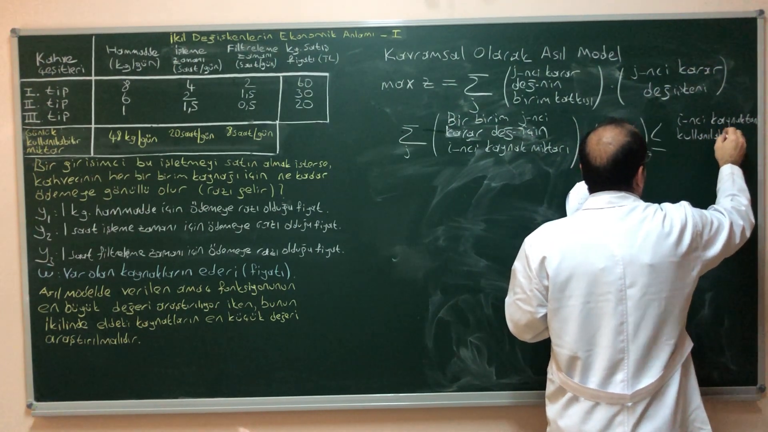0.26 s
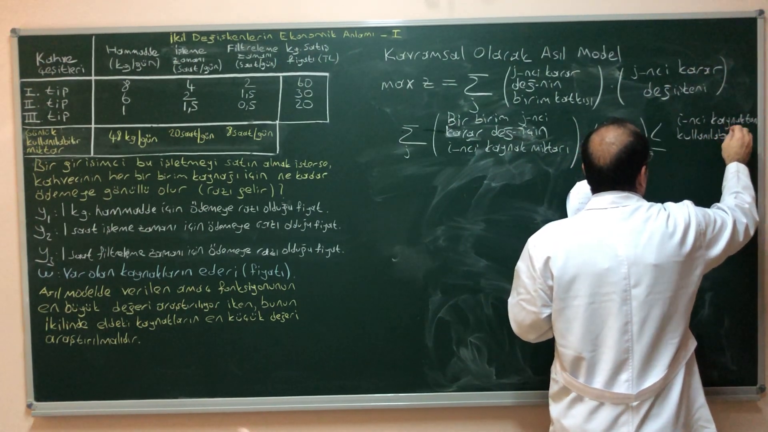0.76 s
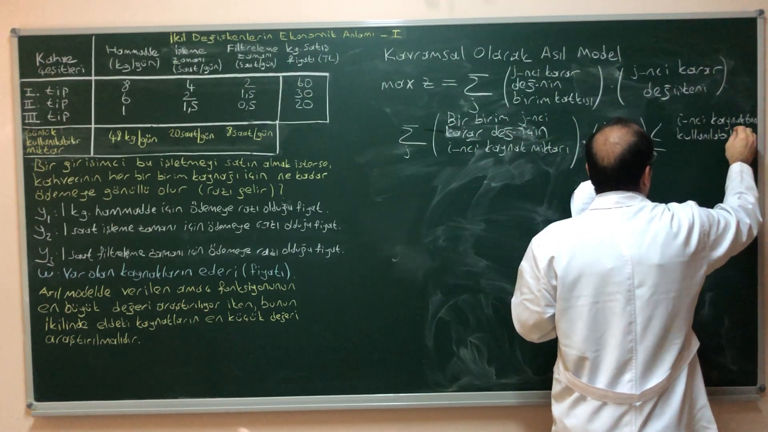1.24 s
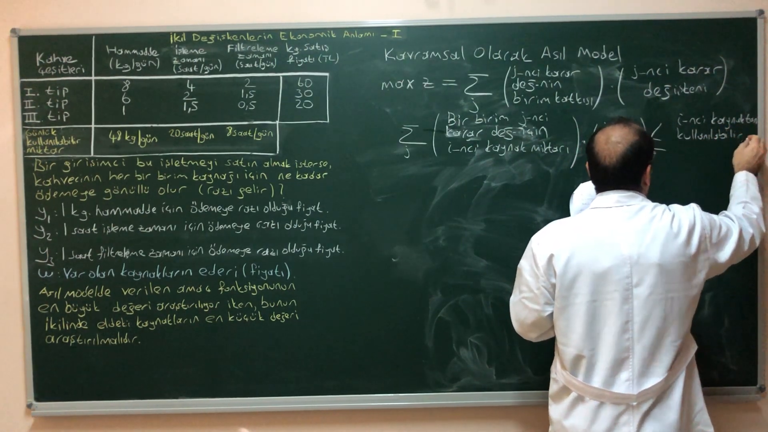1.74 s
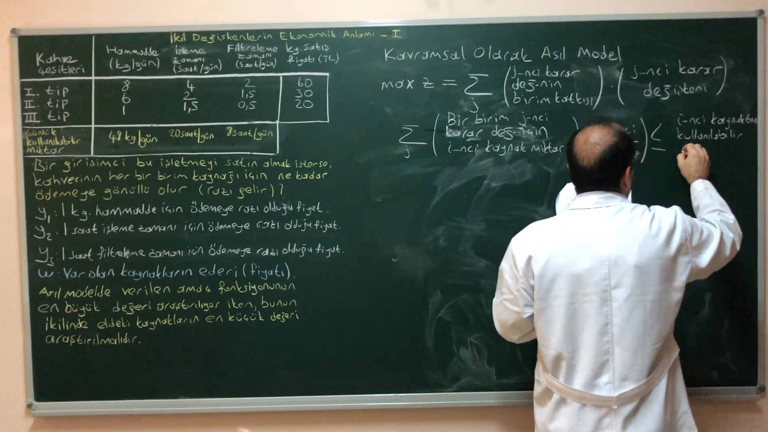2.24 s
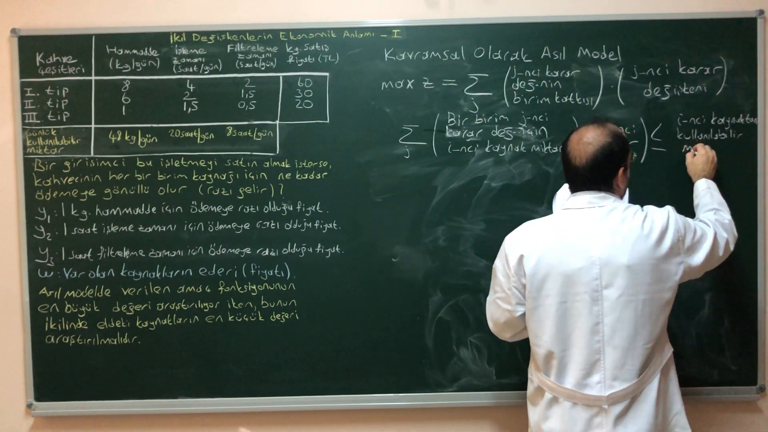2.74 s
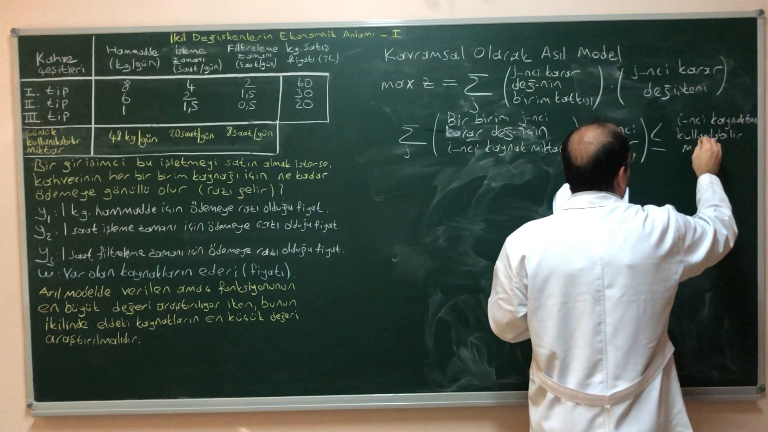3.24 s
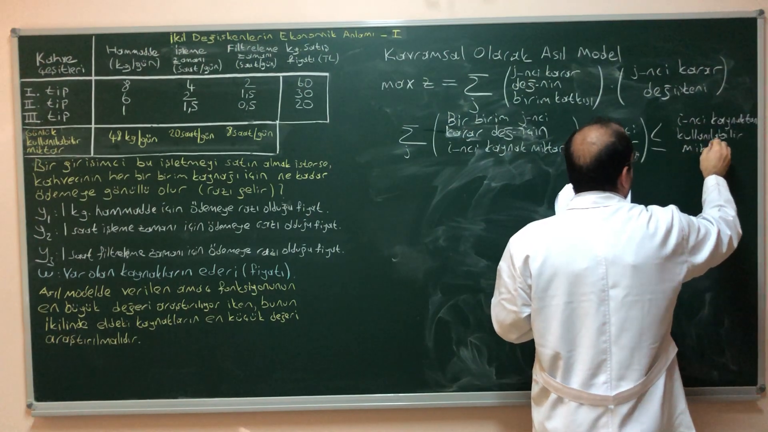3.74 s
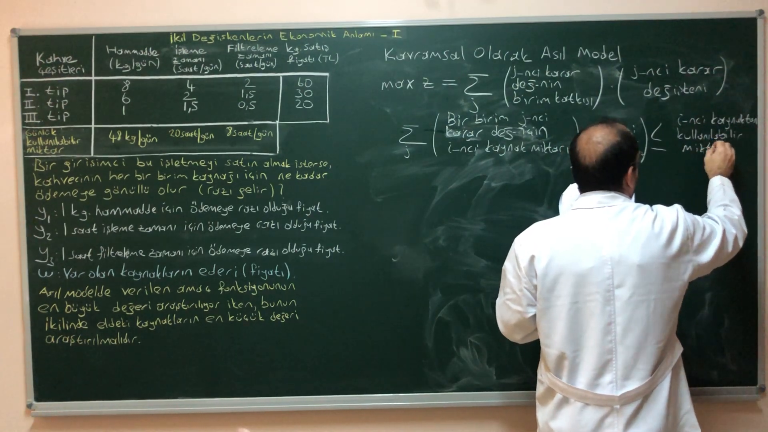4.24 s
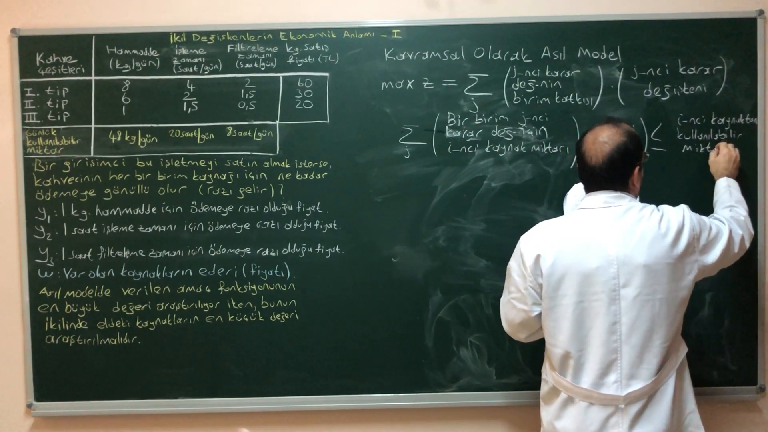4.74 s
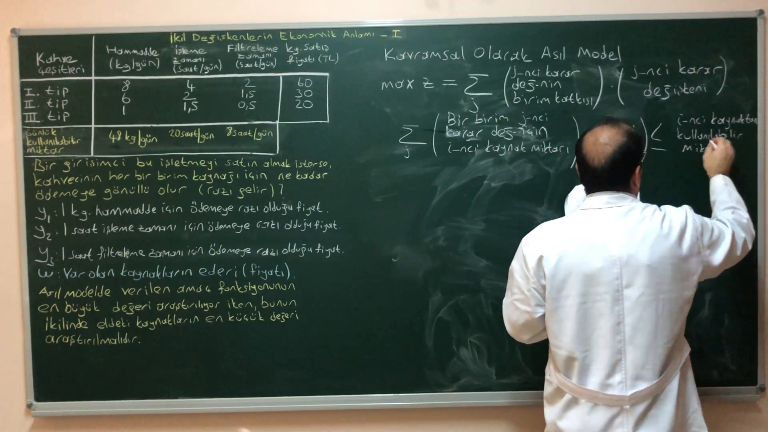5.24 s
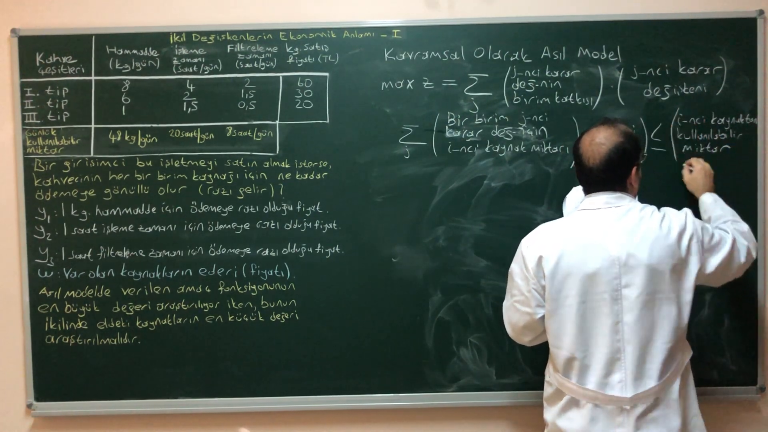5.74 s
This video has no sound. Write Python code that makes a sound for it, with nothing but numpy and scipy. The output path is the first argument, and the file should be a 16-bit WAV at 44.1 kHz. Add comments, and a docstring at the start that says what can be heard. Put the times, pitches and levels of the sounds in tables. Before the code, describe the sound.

Chalk knocks and squeaks briskly on a blackboard in an echoing classroom, pausing midway, then tapping steadily again with one piercing squeak.

```python
"""Chalk writes on a wall-mounted blackboard in a bare, reverberant classroom.
Throughout: ventilation hiss (coloured noise), wavering hum (low sines), a faint rub (grain noise).
0-1.6 s: a stick-slip squeak (sine with overtones), then knocks (filtered clicks), two more squeaks.
1.7-2.8 s: a lull with one faint knock, weak squeaks and soft grinding (swells of grain noise).
2.9-6 s: steady knocks, a strong squeak near 4.5 s, a last knock near 5.5 s, then grinding."""
import sys
import numpy as np
from scipy import signal
from scipy.fft import rfft, irfft
from scipy.io import wavfile
from scipy.ndimage import uniform_filter1d

SR = 44100
rng = np.random.default_rng(int(sys.argv[2]) if len(sys.argv) > 2 else 0)


def materialize(psi):
    """Save the field psi as 16-bit PCM at rate SR to the path in sys.argv[1].

    A 1-D psi becomes a single channel; in a 2-D psi each row is a channel.
    """
    bounded = np.clip(np.atleast_2d(psi).T, -1, 1)
    quanta = np.round(bounded * 32767).astype(np.int16)
    wavfile.write(sys.argv[1], SR, quanta)


N = 264159


def undb(db):
    """Amplitude ratio of a level in dB."""
    return 10 ** (np.asarray(db) / 20)


def rms(x):
    """Root mean square, kept above zero."""
    return np.sqrt(np.mean(x ** 2)) + 1e-12


def on_log_hz(table, hz):
    """Reads a (Hz, value) table along a log-frequency axis."""
    table_hz, value = np.transpose(table)
    return np.interp(np.log(np.maximum(hz, 1)), np.log(table_hz), value)


def coloured(white, table):
    """Gives white noise the (Hz, dB) spectrum; rms 1."""
    gain = undb(on_log_hz(table, np.fft.rfftfreq(len(white), 1 / SR)))
    noise = irfft(rfft(white) * gain, len(white))
    return noise / rms(noise)


def walk(rate_hz):
    """Slow random curve: values held 1 / rate_hz seconds, smoothed twice."""
    hold = int(SR / rate_hz)
    held = rng.standard_normal(2000)[np.arange(N) // hold]
    return uniform_filter1d(uniform_filter1d(held, hold), hold)


def add(out, x, start):
    """Mixes x in from sample start."""
    x = x[:len(out) - start]
    out[start:start + len(x)] += x


def causal(db):
    """Minimum-phase response with the given dB gains on an even frequency grid."""
    cepstrum = irfft(np.log(undb(db)))
    half = len(cepstrum) // 2
    # fold negative time onto positive time
    cepstrum[1:half] *= 2
    cepstrum[half + 1:] = 0
    return irfft(np.exp(rfft(cepstrum)))


# Decay of the room. Each row: frequency in Hz, time to fall 60 dB in s.
ROOM_DECAY = [(200, 0.56), (600, 0.54), (1400, 0.48), (3600, 0.42), (7000, 0.34), (13000, 0.63)]
ROOM_LENGTH_S, ROOM_GAP_S = 0.8, 0.0027
EARLY_DB, EARLY_S = 5, 0.0051  # boost of the first reflections, its time constant


def room(x, wet_db):
    """Direct sound plus a dense noise tail that fades band by band; each call draws new paths."""
    n = int(ROOM_LENGTH_S * SR)
    hz, _, cells = signal.stft(rng.standard_normal(n), SR, nperseg=128)
    cell_s = np.arange(cells.shape[1]) * 64 / SR
    fade = np.exp(-np.log(1000) * cell_s / on_log_hz(ROOM_DECAY, hz)[:, None])
    tail = signal.istft(cells * fade, SR, nperseg=128)[1][:n]
    age_s = np.arange(len(tail)) / SR
    # the nearest walls answer first and strongest
    tail *= np.clip(age_s / ROOM_GAP_S, 0, 1) ** 2
    tail *= undb(EARLY_DB * np.exp(-age_s / EARLY_S))
    wet = signal.fftconvolve(x, tail)
    dry_energy = np.sum(x ** 2)
    wet *= undb(wet_db) * np.sqrt(dry_energy / np.sum(wet ** 2))
    add(wet, x, 0)
    # direct and reflected energy add up, whatever the pitch
    return wet * np.sqrt(dry_energy * (1 + undb(2 * wet_db)) / np.sum(wet ** 2))


# Spectrum of the ventilation. Each row: frequency in Hz, relative level in dB.
VENTILATION_COLOUR = [(22, -48), (40, -22), (55, -6), (90, -3.5), (130, -6.5), (200, -13.5), (280, -9),
                      (400, -16), (600, -21.5), (1000, -17.5), (1600, -31), (3000, -39.5), (5000, -33),
                      (9000, -40), (15800, -42.5)]
VENTILATION_DB, VENTILATION_SWELL_DB = -62, 0.7
# Hum tones. Each row: centre pitch in Hz, mean level in dB rms, scale of the pitch waver in Hz.
HUM_TONES = [(73.5, -78, 7.1), (99.3, -64.5, 7.3), (146.5, -68, 15), (199.5, -66.5, 3), (418, -78.5, 4.3)]


def classroom(waver_db=-0.5):
    """Smooth ventilation noise and a few low tones that waver in pitch and level."""
    swell_db = VENTILATION_DB + VENTILATION_SWELL_DB * walk(0.86)
    out = undb(swell_db) * coloured(rng.standard_normal(N), VENTILATION_COLOUR)
    for hz, db, pitch_waver_hz in HUM_TONES:
        phase = 2 * np.pi * np.cumsum(hz + pitch_waver_hz * walk(8)) / SR
        out = out + np.sqrt(2) * undb(db + waver_db * walk(13)) * np.sin(phase)
    return out


# Spectrum of the grinding grains. Each row: frequency in Hz, relative level in dB.
GRIT_COLOUR = [(200, -21.5), (400, -11.5), (900, -4.5), (1300, 1), (2000, -1.5), (2300, -4.5), (2600, -1),
               (3300, -1.5), (3750, -6), (4300, -4.5), (5200, -11), (8000, -15), (15500, -23.5)]
# Grinding strokes. Each row: start in s, length of the hold in s, level in dB before the split
# into bands and the room, treble level in dB relative to that.
GRINDING_STROKES = [(0.01, .05, -57, -1.5), (.45, 0.07, -68.5, -7), (.86, .08, -65, 1.5),
                    (1.36, 0.083, -66.5, -9), (1.72, 0.2, -69.5, -3.5), (2.216, .08, -59.5, -6),
                    (2.329, .06, -60, -6.5), (2.447, 0.048, -64, 0.5), (2.568, .14, -65.5, -3),
                    (3.66, 0.037, -67.5, 0.5), (3.96, .08, -63.5, -2), (4.46, 0.18, -65, -0.5),
                    (5.0, 0.13, -61, -3), (5.36, .04, -73, 1.5), (5.586, 0.15, -57.5, 4.5),
                    (5.84, .14, -68, 1)]
STROKE_RISE_DB_PER_S, STROKE_FALL_DB_PER_S = 200, 119
HISS_LAG_S = 0.04  # the treble comes up once the chalk has gathered speed
RUSTLE_DB, RUSTLE_BRIGHT_DB = -73.5, -1.5  # faint rub of hand and dust between strokes


def scrape(grit_db=2.5, patchy_db=2.0, wet_db=-4.5, split_hz=4000.0):
    """Dense grains of uneven size crush under the chalk; each stroke swells, holds and dies away."""
    t_s = np.arange(N) / SR
    grain_size = undb(grit_db * rng.exponential(size=N))
    grit = coloured(rng.standard_normal(N) * grain_size, GRIT_COLOUR)
    body = signal.sosfilt(signal.butter(2, split_hz, fs=SR, output="sos"), grit)
    hiss = grit - body
    body_gain, hiss_gain = undb(RUSTLE_DB), undb(RUSTLE_DB + RUSTLE_BRIGHT_DB)
    for start_s, length_s, db, bright_db in GRINDING_STROKES:
        fall_db = db - STROKE_FALL_DB_PER_S * np.maximum(t_s - start_s - length_s, 0)
        body_rise_db = STROKE_RISE_DB_PER_S * np.maximum(start_s - t_s, 0)
        hiss_rise_db = STROKE_RISE_DB_PER_S * np.maximum(start_s + HISS_LAG_S - t_s, 0)
        body_gain = np.maximum(body_gain, undb(fall_db - body_rise_db))
        hiss_gain = np.maximum(hiss_gain, undb(fall_db + bright_db - hiss_rise_db))
    rub = (body_gain * body + hiss_gain * hiss) * undb(patchy_db * walk(25))
    return room(rub, wet_db)[:N]


# Squeaks. Each row: overtone fall in dB at the lowest pitch, grip unevenness 0-1 at the loudest
# point, and the tip's course as rows of time in s, slip rate in Hz, fundamental in dB before the room.
STICK_SLIPS = [ (-12.5, 0.14, [(.011, 1567, -21.5), (.02, 1505, -24.5), (.03, 1550, -36),
               (.045, 1590, -33.5), (.06, 1660, -37)]), (-16, 0.31, [(1.295, 1500, -26),
               (1.32, 1440, -31.5), (1.345, 1458, -40.5), (1.38, 1446, -49.5), (1.42, 1459, -42.5)]),
               (-10.5, 0.13, [(1.508, 1432, -20.5), (1.52, 1370, -33.5), (1.533, 1351, -19.5),
               (1.553, 1353, -19.5), (1.562, 1397, -21.5), (1.572, 1450, -18.5), (1.585, 1490, -32),
               (1.595, 1614, -31)]), (-39, 0.89, [(2.32, 1650, -54), (2.4, 1740, -60.5)]),
               (-25, 0.13, [(2.57, 1700, -63), (2.6, 1637, -57), (2.627, 1723, -56.5), (2.64, 1705, -27.5),
               (2.655, 1634, -42), (2.68, 1730, -49)]), (-40, 0.96, [(3.15, 1648, -38), (3.18, 1663, -51)]),
               (-12.5, .06, [(4.517, 1520, -21), (4.535, 1498, -13), (4.553, 1489, -14.5),
               (4.565, 1438, -21.5), (4.585, 1390, -29)]), (-34, 0.62, [(4.995, 1546, -44.5),
               (5.015, 1650, -45), (5.05, 1670, -55), (5.1, 1720, -66.5)]), ]
SQUEAK_ATTACK_S, SQUEAK_RELEASE_S, SQUEAK_EDGE_DB = 0.008, 0.0074, -35.5
SHARP_DB_PER_KHZ = -33  # slower slips snap harder and carry more overtones
ROUGH_PER_DB = -0.0251  # the grip evens out as the squeak weakens


def squeaks(waver=0.0017, second_db=5.5, wet_db=2.0, blur_hz=90.0):
    """The tip sticks and slips at a wavering rate: a tone with overtones, blurred by uneven grip."""
    out, drift = np.zeros(N), walk(120)
    blur = signal.butter(4, blur_hz, fs=SR, output="sos")
    grip = signal.sosfilt(blur, rng.standard_normal((2, N)))
    grip /= rms(grip)
    harmonic = np.arange(1, 11)[:, None]
    overtone = harmonic - 1
    for sharp_db, uneven, course in STICK_SLIPS:
        s, hz, db = np.transpose(course)
        first = max(int((s[0] - SQUEAK_ATTACK_S) * SR), 0)
        i = np.arange(first, int((s[-1] + SQUEAK_RELEASE_S) * SR))
        t_s = i / SR
        hz, db = np.interp(t_s, s, hz), np.interp(t_s, s, db)
        rough = np.clip(uneven + ROUGH_PER_DB * (db.max() - db), 0, 1)
        fall_db = sharp_db + SHARP_DB_PER_KHZ * (hz - hz.min()) / 1000
        edge = np.maximum((s[0] - t_s) / SQUEAK_ATTACK_S, (t_s - s[-1]) / SQUEAK_RELEASE_S)
        db = db + SQUEAK_EDGE_DB * np.maximum(edge, 0)
        # uneven grip jitters phase (radians) and size
        phase = 2 * np.pi * np.cumsum(hz * (1 + waver * drift[i])) / SR + rough * grip[0, i]
        size = np.sqrt(1 - rough ** 2) + rough * grip[1, i]
        # the first overtones fall fast, the higher ones flatten out
        overtone_db = fall_db * 3.5 * (1 - np.exp(-overtone / 2.56)) - 2.93 * overtone
        gain = undb(overtone_db + second_db * (harmonic == 2))
        tone = (gain * np.sin(harmonic * phase)).sum(0)
        add(out, room(np.sqrt(2) * undb(db) * size * tone, wet_db), first)
    return out


# Broad response of the board to a knock. Each row: frequency in Hz, relative level in dB.
BOARD_RESPONSE = [(120, -44.5), (230, -14), (340, -2), (450, -7.5), (700, -2), (1220, 0.5), (1600, -0.5),
                  (2200, -1), (2600, -6), (2820, -9), (3250, -11.5), (3700, -15.5), (4300, -17.5),
                  (5500, -24), (8000, -33.5), (14000, -51)]
# Chalk landings. Each row: time in s, level in dB before direct_db and the room, hardness in dB per
# octave above 1500 Hz, thud in dB per octave below it (both up to 2 octaves), mid-body knock in dB.
LANDINGS = [(0.341, -27, 0.5, 0.0, -1), (0.57, -19, -0.5, -0.5, 0.5), (0.773, -24.5, 1.5, -1.5, -2.5),
            (1.052, -24, -0.5, -2, -3), (1.267, -21.5, -2.5, -1.5, -1.5), (1.443, -39, -0.5, 1, 2.5),
            (2.188, -38.5, -5, 4, 0), (2.896, -29, -2.5, 2, 1), (3.124, -24, -4, 3, 3.5),
            (3.316, -23.5, 3.5, 2.5, 4.5), (3.561, -21.5, 1, 0.5, 2), (3.86, -24, -0.5, 0.5, 0),
            (4.192, -20.5, 0.5, -0.5, 0.0), (4.382, -24, 4, 1, 1), (4.702, -22, 1.5, 1, 2),
            (4.918, -36.5, -2.5, 3, -10.5), (5.53, -25, 0, -1.5, -6)]


def taps(wet_db=16.0, direct_db=-4.5, lead_s=0.0015):
    """Each landing knocks the board; hard landings wake the treble, heavy ones the bass."""
    out, hz = np.zeros(N), np.fft.rfftfreq(2048, 1 / SR)
    octave = np.log2(np.maximum(hz, 1) / 1500.0)
    treble, bass = np.clip(octave, 0, 2), np.clip(-octave, 0, 2)
    body = np.exp(-((octave - 0.55) / 0.99) ** 2)  # centred near 2.2 kHz
    board_db = on_log_hz(BOARD_RESPONSE, hz)
    for s, level_db, hard_db, thud_db, body_db in LANDINGS:
        knock = causal(board_db + hard_db * treble + thud_db * bass + body_db * body)
        # the first arrival is weaker than the peak that the near walls build up
        knock *= undb(level_db + direct_db) / np.abs(knock).max()
        # contact begins a moment before the sound peaks
        add(out, room(knock, wet_db), int((s - lead_s) * SR))
    return out


def scene():
    """Sums room tone, grinding, squeaks and knocks into one channel."""
    return (classroom() + scrape() + squeaks() + taps())[None]


def record(dry, top_hz=15780):
    """Steep elliptic low-pass: next to nothing is left above top_hz."""
    return signal.sosfilt(signal.ellip(10, 0.2, 60, top_hz, fs=SR, output="sos"), dry)


dry = scene()
out = record(dry)
materialize(out)
```